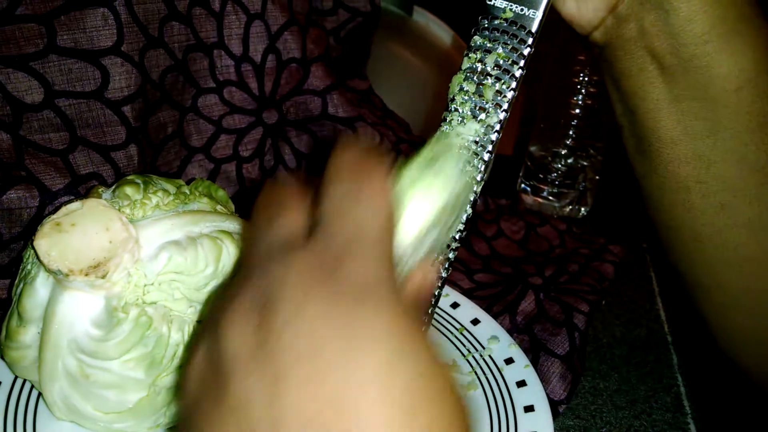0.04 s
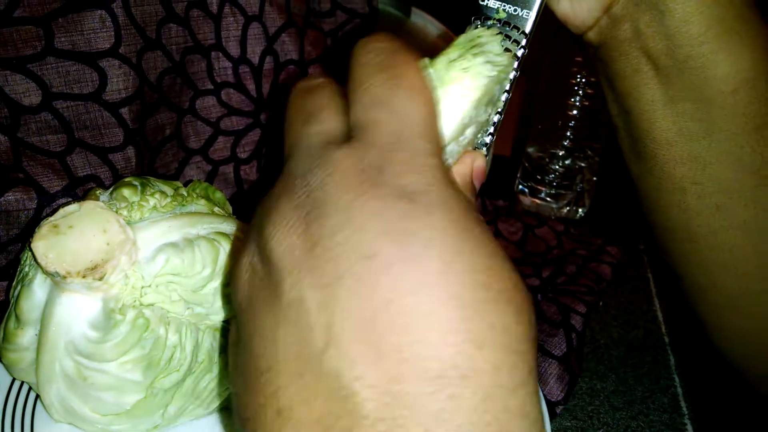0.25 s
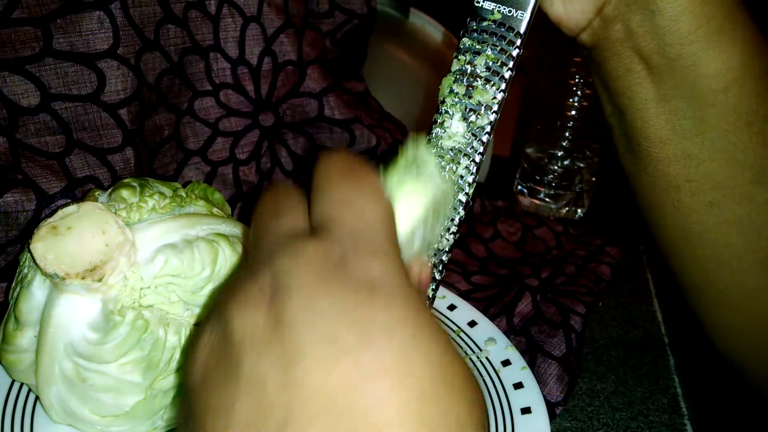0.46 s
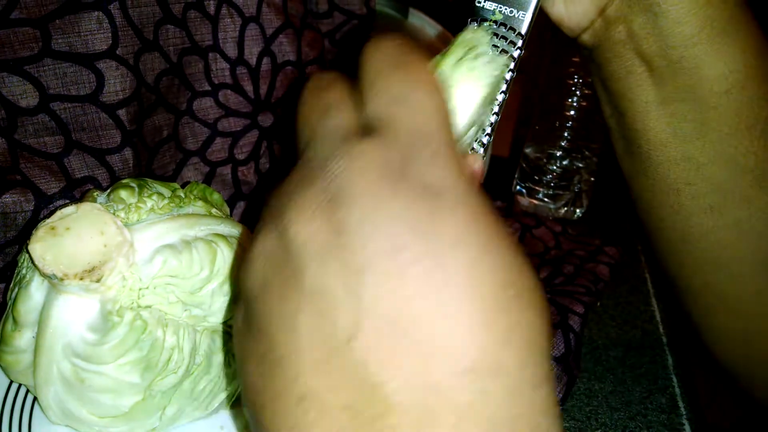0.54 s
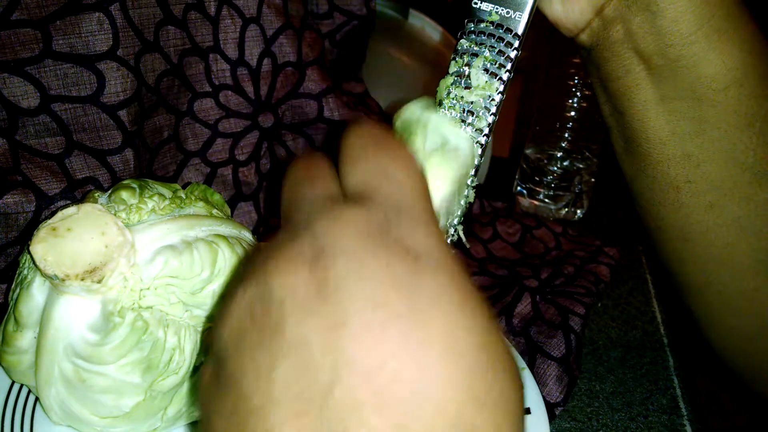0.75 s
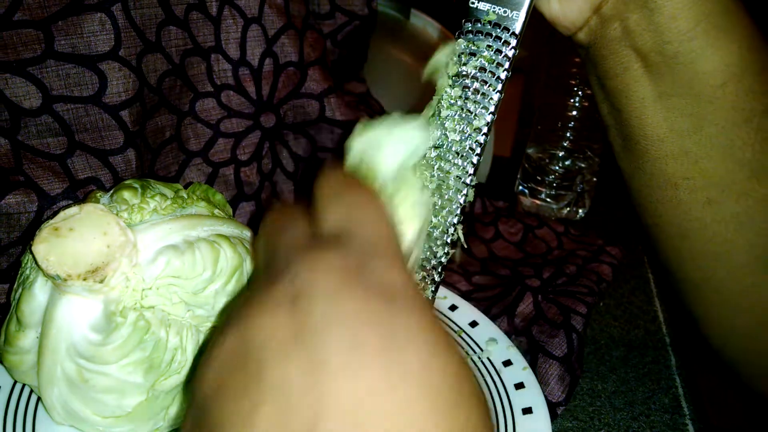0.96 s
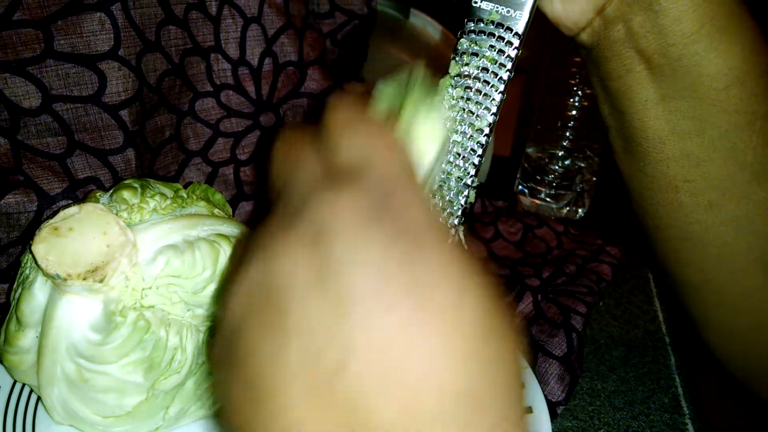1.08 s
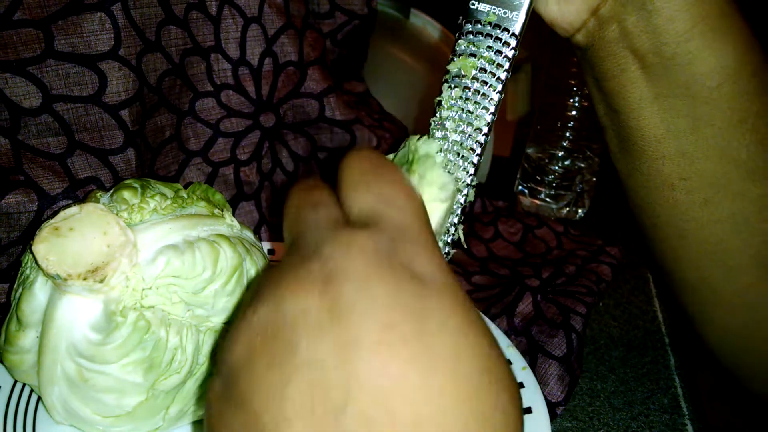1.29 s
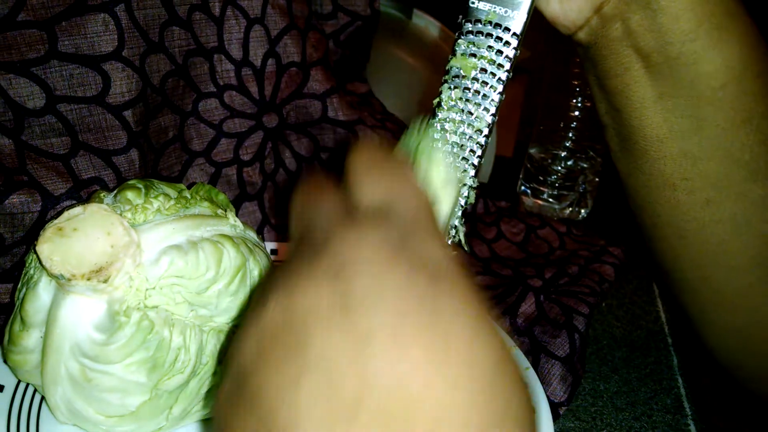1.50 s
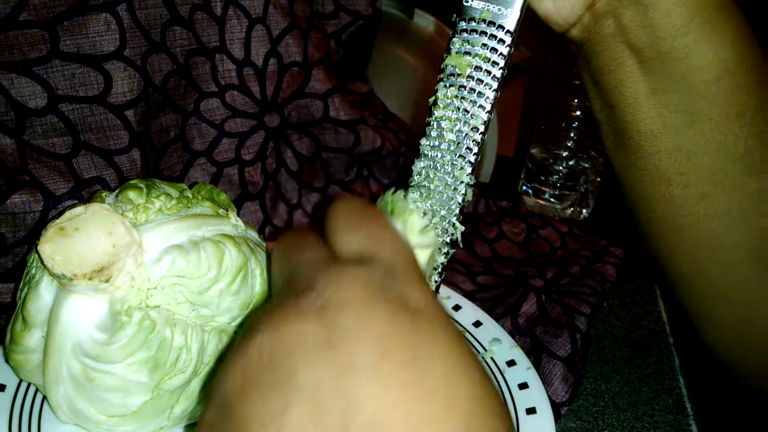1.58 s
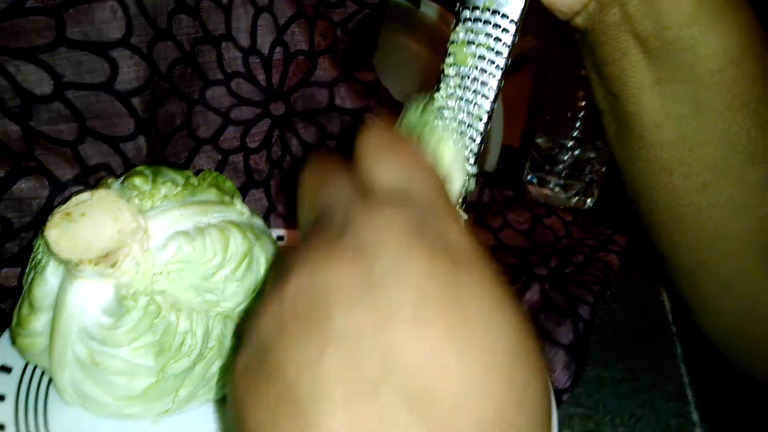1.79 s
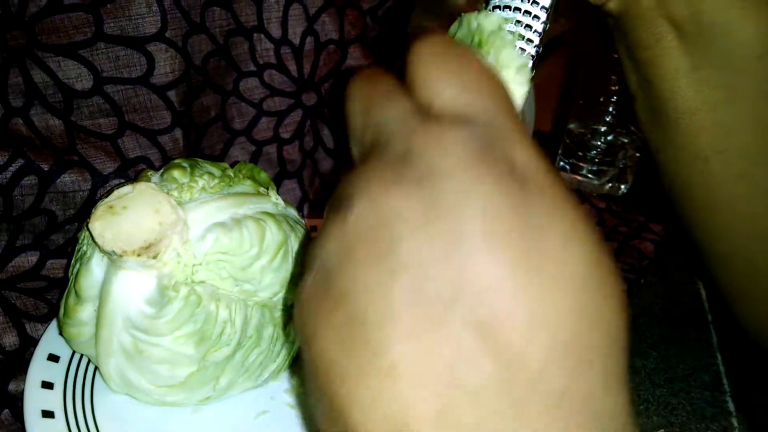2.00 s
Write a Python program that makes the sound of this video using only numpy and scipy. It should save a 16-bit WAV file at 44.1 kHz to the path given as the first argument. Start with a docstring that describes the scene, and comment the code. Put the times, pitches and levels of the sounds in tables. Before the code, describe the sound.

Close, dry rasping of cabbage on metal teeth, three to four cycles per second; strong crunchy downstrokes, lighter return scrapes, tiny snaps and dull table thumps, faint hush and short indoor reverberation behind.

```python
"""A soft upward slide, then a dense downward crackle: cabbage rubbed on a narrow steel grater, 3.5 cycles per s.
Fibres tear as streams of random clicks; rows of teeth jolt modes of plate and table; the blade rings along.
Leaf ribs catch as short gliding squeaks, with dry noise snaps. Faint hush and a short room tail lie behind.
A close phone hears it at two ports: right first, left late and shadowed in the treble."""
import sys
import numpy as np
from scipy import signal
from scipy.fft import rfft, irfft
from scipy.io import wavfile
from scipy.ndimage import uniform_filter1d

SR = 44100
rng = np.random.default_rng(int(sys.argv[2]) if len(sys.argv) > 2 else 0)


def store_pcm(level_fs):
    """Save levels as 16-bit WAV."""
    pcm = np.round(np.clip(level_fs, -1, 1) * 32767).astype(np.int16)
    wavfile.write(sys.argv[1], SR, np.atleast_2d(pcm).T)


N = 90052
T = np.arange(N) / SR
F = np.fft.rfftfreq(N, 1 / SR)


def undb(db):
    """Decibels to amplitude."""
    return 10 ** (np.asarray(db) / 20)


def level(x, db):
    """Scale x to an RMS level."""
    return x * undb(db) / np.sqrt(np.mean(x ** 2))


def over_f(table):
    """Interpolate a table over log frequency at every FFT bin."""
    a = np.array(table, float)
    return np.interp(np.log(F + 1), np.log(a[:, 0] + 1), a[:, 1])


def shape(x, gain):
    """Filter x by a gain per FFT bin."""
    return irfft(rfft(x) * gain, N)


def walk(rate_hz):
    """Random levels, each held 1 / rate_hz and slewed to the next."""
    k = int(SR / rate_hz)
    held = np.repeat(rng.standard_normal(N // k + 1), k)
    return uniform_filter1d(held, k)[:N]


def ring(x, hz, t60_s):
    """One decaying mode: a complex one-pole resonator driven by x."""
    pole = np.exp(2j * np.pi * hz / SR - np.log(1000) / (t60_s * SR))
    return signal.lfilter([1], [1, -pole], x).imag * np.sqrt(1 - abs(pole))


def body(x, modes):
    """Parallel modes driven by x, summed and scaled to unit RMS."""
    return level(sum(undb(db) * ring(x, hz, t60_s) for hz, db, t60_s in modes), 0)


# background noise spectrum: freq_hz, relative_density_db
HUSH_SPECTRUM = [(30, 26.5), (60, 13), (100, -12), (400, -3), (1200, -5.5), (4000, -47), (15000, -44)]
HUSH_DB = -39.5


def hush():
    """Steady shaped noise, independent at each port."""
    gain = undb(over_f(HUSH_SPECTRUM))
    return np.array([level(shape(rng.standard_normal(N), gain), HUSH_DB) for _ in range(2)])


ROOM_DB, ROOM_T60_S = -15, .25


def room(right):
    """Right-port sound convolved with two decaying noise tails, treble damped."""
    u = T[:SR // 2]
    tail = rng.standard_normal((2, len(u))) * undb(-60 * u / ROOM_T60_S)
    tail /= np.sqrt(np.sum(tail[0] ** 2))
    wet = signal.fftconvolve(right[None], tail, axes=1)[:, :N]
    return undb(ROOM_DB) * np.array([shape(w, 1 / (1 + F / 4000)) for w in wet])


# left-port phase lead: freq_hz, lead_rad
PORT_PHASE = [(0, 0), (1640, -.2), (2430, -2.7), (2570, -3.1), (2800, -3.2), (2960, -3.8), (3450, -6.1),
              (4130, -6.6), (6460, -12.8), (15300, -31.6)]
# left level against right: freq_hz, left_minus_right_db
SHADOW = [(50, 3), (110, 0.5), (200, -1), (700, -4.5), (1290, -0.5), (2650, -0.5), (4400, -1), (5400, -4.5),
          (8120, -6), (11000, -10), (15000, -13.5)]
# amplitude share common to both ports: freq_hz, share_0_1
ALIKE = [(40, 0.099), (100, 0.89), (250, 0.59), (1200, 1), (1900, 0.98), (2350, 0.96), (2600, 1),
         (2950, 0.85), (3250, 0.58), (3900, 1), (4600, 0.63), (8000, 0.5), (15000, 0.39)]
# slow random phase wander between left and right around 2.7 kHz
WANDER_RAD, WANDER_RATE_HZ, WANDER_CENTRE_HZ, WANDER_WIDTH_HZ = .2, 9, 2700, 500


def ports(common, own):
    """Left gets the common sound late plus its own part, treble shadowed; right gets the common sound."""
    alike = np.clip(over_f(ALIKE), 0, 1)
    freq_hz, lead_rad = np.array(PORT_PHASE).T
    lead = np.exp(1j * np.interp(F, freq_hz, lead_rad))
    # small-angle phase turn: a quadrature copy of a narrow band
    quadrature = 1j * np.exp(-((F - WANDER_CENTRE_HZ) / WANDER_WIDTH_HZ) ** 2)
    wander = WANDER_RAD * walk(WANDER_RATE_HZ) * shape(common, lead * quadrature)
    left = wander + shape(common, lead * alike) + shape(own, np.sqrt(1 - alike ** 2))
    return np.array([shape(left, undb(over_f(SHADOW))), common])


# rasp spectrum at the right port, main range and top: freq_hz, relative_density_db
RASP_SPECTRUM = [(150, -19), (400, -17), (800, -2.5), (1300, -9), (1750, -5.5), (2250, -4), (3000, -4),
                 (3600, -0.5), (4200, 1), (5100, -0.5), (5600, -1), (6400, -0.5), (7000, 0), (8200, -5)]
RASP_TOP = [(11000, -6.5), (14000, -7), (15400, -5)]


def rasp_colour(x):
    """Filter x to the rasp spectrum."""
    return shape(x, undb(over_f(RASP_SPECTRUM + RASP_TOP)))


# steel blade modes: freq_hz, relative_db, t60_s
BLADE_MODES = [(1665, -7, .04), (3500, -5, .03), (3680, -4, .03), (3830, -5, .03), (4100, -3, .03),
               (4400, -5, .025), (5170, -5, .02), (6600, -4, .02)]


def blade(x, t60_scale=1):
    """Blade modes driven by x, at unit RMS."""
    return body(x, [(hz, db, t60_s * t60_scale) for hz, db, t60_s in BLADE_MODES])


# dry snaps: start_s, relative_level_db
SNAPS = [(.0159, -18), (.1311, -7), (.162, -7), (.2409, -13), (.258, -16), (.3795, -15), (.4243, -7),
         (.4365, -4), (.5282, -9), (.548, -17), (.6818, -16), (.7462, -3), (.8215, -18), (.8525, -18),
         (.9043, -15), (.9727, -16), (.9981, -12), (1.0505, -7), (1.1265, -17), (1.1352, -10),
         (1.2405, -10), (1.281, -9), (1.3105, -7), (1.3315, -7), (1.4262, -10), (1.660, -6), (1.7005, -16),
         (1.72, -10), (1.728, -9), (1.8487, -10), (1.9684, -12), (1.9954, -20)]
SNAP_DECAY_S = .0005  # to 1/e


def snaps():
    """Sharp noise bursts with exponential decay, rasp coloured."""
    out = np.zeros(N)
    u = T[:SR // 200]
    for start_s, level_db in SNAPS:
        burst = np.exp(-u / SNAP_DECAY_S) * rng.standard_normal(len(u)) / 2
        out[int(start_s * SR):][:len(u)] += undb(level_db) * burst
    return rasp_colour(out)


# leaf ribs catching on a tooth:
# middle_s, level_db, pitch_hz, half_length_s, glide_per_s, roughness_0_1, relative_blade_db
SQUEAKS = [(1.1465, -24, 920, .0035, 12, .15, -24), (1.2415, -31, 1380, .003, 10, .7, -25),
           (1.665, -26, 680, .007, -8, .2, -32), (1.275, -33, 1420, .004, 0, .9, -34),
           (1.281, -40, 1350, .003, 0, .9, -25), (1.167, -40, 1100, .003, 0, .9, -28)]
SQUEAK_ROUGH_RATE_HZ = 900


def squeaks():
    """Gliding rough tones under a bell; one slip per cycle rings the blade."""
    out, slips = np.zeros(N), np.zeros(N)
    for middle_s, level_db, pitch_hz, half_s, glide, rough, blade_db in SQUEAKS:
        u = T - middle_s
        bell = np.exp(-(u / half_s) ** 2 / 2)
        phase_rad = 2 * np.pi * pitch_hz * u * (1 + glide * u / 2)
        phase_rad += rough * walk(SQUEAK_ROUGH_RATE_HZ)
        tone = np.sin(phase_rad)
        out += undb(level_db) * bell * (1 + rough * walk(SQUEAK_ROUGH_RATE_HZ)) * tone
        slips += undb(blade_db) * bell * np.diff(np.sign(tone), prepend=0).clip(0, 1)
    rung = blade(slips, t60_scale=.5)
    # peak is set by the strongest blade_db
    rung *= undb(max(row[-1] for row in SQUEAKS)) * 2 / np.abs(rung).max()
    return out + rung


# rows of teeth passing under the wedge: time_s, jolts_per_s
ROWS = [(0.0, 121), (0.14, 112), (0.44, 106), (0.48, 96.5), (0.57, 87), (0.77, 111), (1.0, 119),
        (1.05, 107.6), (1.4, 109.7), (1.46, 95.7), (1.54, 92), (1.62, 119), (1.87, 99), (2.04, 117)]
ROW_JITTER_ROWS, ROW_SPREAD_DB, ROW_NOISE_DB = .09, 3, -1


def jolts():
    """One uneven impulse per row of teeth, over tearing noise."""
    spread, noise = rng.standard_normal((2, N))
    time_s, jolts_per_s = np.array(ROWS).T
    rows = np.cumsum(np.interp(T, time_s, jolts_per_s)) / SR + ROW_JITTER_ROWS * walk(100)
    hits = np.diff(np.floor(np.maximum.accumulate(rows)), prepend=0)
    return level(hits * undb(ROW_SPREAD_DB * spread), 0) + undb(ROW_NOISE_DB) * noise


# plate and table modes: freq_hz, relative_db, t60_s
TABLE_MODES = [(82, -3, .06), (109, 1.5, .07), (181, -3.5, .12), (215, -11, .07), (298, -3, .1),
               (330, -8, .08), (361, -5, .11), (400, -4, .1), (445, -10, .07), (513, -12, .2),
               (662, -15, .07)]
# drive by the hand: time_s, lowest_modes_db, upper_modes_db
SHAKING = [(0.0, -53, -41), (0.03, -41, -41), (0.07, -48, -37), (0.1, -39, -45.5), (0.16, -44, -30.5),
           (0.19, -30, -33), (0.23, -41, -51), (0.25, -55, -42), (0.32, -59, -43.5), (0.38, -44, -45),
           (0.42, -30.5, -31), (0.46, -29.5, -32), (0.52, -48, -45), (0.68, -51, -40), (0.71, -29, -35.5),
           (0.76, -36, -29), (0.83, -52, -47.5), (0.87, -40, -42), (0.94, -55, -43), (0.96, -43, -45),
           (0.99, -45, -36), (1.02, -39, -44), (1.04, -33.5, -31), (1.11, -37, -38.5), (1.16, -54, -45.5),
           (1.21, -68, -41.5), (1.31, -27, -33), (1.33, -36, -31.5), (1.43, -54, -49), (1.46, -55, -46.5),
           (1.56, -43, -42), (1.58, -30, -40.5), (1.62, -40, -31.5), (1.69, -41, -42), (1.8, -68, -43),
           (1.82, -40, -46), (1.89, -36, -31.5), (1.94, -31, -35.5), (1.98, -58, -48), (2.04, -43, -39.5)]
LOW_MODES, LOW_DB, UPPER_DB = 2, -1.5, 1.5
LEAD_S = 0.0046  # the push comes before the ring


def table_and_plate():
    """Jolts, scaled by the shaking curves, ring the lowest and the upper modes."""
    rows = jolts()
    time_s, low_db, upper_db = np.array(SHAKING).T
    low = rows * undb(np.interp(T + LEAD_S, time_s, low_db))
    upper = rows * undb(np.interp(T + LEAD_S, time_s, upper_db))
    low_ring = undb(LOW_DB) * body(low, TABLE_MODES[:LOW_MODES]) * np.std(low)
    upper_ring = undb(UPPER_DB) * body(upper, TABLE_MODES[LOW_MODES:]) * np.std(upper)
    return low_ring + upper_ring


# cutting and return strokes, one curve each: time_s, rasp_level_db
DOWN = [
    [(0.1, -50), (0.118, -29), (0.134, -21), (0.188, -21.5), (0.214, -31.5), (0.222, -42), (0.23, -45)],
    [(0.37, -45), (0.384, -31), (0.434, -18.5), (0.482, -23), (0.51, -49.5)],
    [(0.67, -47), (0.676, -45), (0.682, -31.5), (0.702, -23), (0.742, -18), (0.792, -30), (0.81, -44)],
    [(0.96, -46.5), (0.99, -26), (1.05, -21), (1.088, -24.5), (1.098, -37), (1.104, -35), (1.11, -31)],
    [(1.26, -41.5), (1.272, -31.5), (1.28, -23.5), (1.33, -18.5), (1.374, -28.5), (1.39, -36)],
    [(1.54, -44), (1.552, -31.5), (1.568, -25), (1.612, -20), (1.662, -21), (1.672, -29), (1.68, -37)],
    [(1.82, -36), (1.832, -40.5), (1.85, -27.5), (1.91, -19.5), (1.952, -29), (1.962, -42), (1.97, -32)],
]
UP = [
    [(0.0, -33), (0.01, -33.5), (0.022, -29.5), (0.042, -37.5), (0.068, -36.5), (0.1, -43)],
    [(0.23, -48), (0.258, -32), (0.312, -36.5), (0.326, -36.5), (0.37, -52)],
    [(0.51, -35), (0.532, -49), (0.536, -37.5), (0.566, -29), (0.628, -32.5), (0.67, -45)],
    [(0.81, -46), (0.822, -34), (0.844, -40), (0.854, -32), (0.91, -30.5), (0.96, -42)],
    [(1.11, -51), (1.12, -39.5), (1.14, -25.5), (1.208, -34), (1.242, -30), (1.26, -42)],
    [(1.39, -51), (1.41, -39.5), (1.426, -31), (1.508, -35.5), (1.512, -37), (1.54, -36)],
    [(1.68, -38.5), (1.726, -24), (1.78, -36), (1.79, -30.5), (1.814, -41), (1.82, -42)],
    [(1.97, -32), (1.98, -43), (1.99, -35), (1.996, -36), (2.026, -31), (2.04, -38)],
]
# per stroke, relative to the rasp: treble_db, low_middle_db
DOWN_COLOUR = [(1, 3), (1, 2), (1, 2), (1, -0.5), (1, -1.5), (1, 2), (1, 0.5)]
UP_COLOUR = [(0, 1.), (0.999, 1.), (1, 0.65), (1, 0.14), (0, -0.82), (0.999, 0.), (1, 0.37), (1, -0.84)]
# scuffs as the wedge bites or lets go: start_s, level_db, t60_s
SCUFFS = [(0.2408, -26.5, 0.015), (0.382, -35, 0.043), (0.528, -25.5, 0.031), (0.68, -25, 0.034),
          (1.1266, -36, 0.026), (1.135, -28, 0.015), (1.139, -26, .03), (1.276, -35, .04),
          (1.424, -26, 0.058), (1.968, -27, 0.039)]


def strokes():
    """Rasp level with decaying scuffs (dB), colour offsets (dB) and place along the stroke (0-1)."""
    rows = sorted(zip(DOWN + UP, DOWN_COLOUR + UP_COLOUR), key=lambda r: r[0][0][0])
    points = np.array(sorted(p for curve, _ in rows for p in curve))
    starts_s = np.array([curve[0][0] for curve, _ in rows])
    k = np.clip(np.searchsorted(starts_s, T) - 1, 0, None)
    colour_db = np.array([c for _, c in rows], float)[k].T
    along = (T - starts_s[k]) / np.diff(np.append(starts_s, N / SR))[k]
    power = undb(2 * np.interp(T, points[:, 0], points[:, 1]))
    for start_s, level_db, t60_s in SCUFFS:
        age_s = np.clip(T - start_s, 0, None)
        power += (T >= start_s) * undb(2 * level_db - 120 * age_s / t60_s)
    # 10 ms smoothing at the turns
    return 10 * np.log10(power), uniform_filter1d(colour_db, size=441), uniform_filter1d(along, size=441)


TEARS_PER_S, TEAR_SPREAD_DB, TEAR_MOST = 22000, 1, 2.6  # largest size, in spreads
ROUGH_DB = 2.0


def tears(rough):
    """Fibres tearing: dense random clicks of uneven size, stream level wandering."""
    hit = rng.random(N) < TEARS_PER_S / SR
    push = rng.standard_normal(N)
    size = np.minimum(rng.exponential(size=N), TEAR_MOST)
    return level(hit * push * undb(TEAR_SPREAD_DB * size + ROUGH_DB * rough), 0)


# crossovers of the four rasp bands: edge_hz
BAND_EDGES_HZ = 2420, 3230, 8400
# fall of each band along a stroke, negative rises: fade_db
BAND_FADE_DB = 0.5, -6, -3.5, -1
RASP_DB, BLADE_DB, PATCHY_DB = 2.5, -19, 1.5  # blade relative to the unit rasp
MIDDLE_FOLLOWS, MIDDLE_PIVOT_DB = 0.45, -27  # low middle swings less than the rasp


def grating(rough, patchy):
    """Tears heard directly and through the blade, stroke-shaped in four bands, plus table and plate."""
    stroke_db, (treble_db, middle_db), along = strokes()
    x = tears(rough)
    rasp = level(level(rasp_colour(x), 0) + undb(BLADE_DB) * blade(x), RASP_DB)
    lowpasses = [1 / (1 + (F / hz) ** 6) for hz in BAND_EDGES_HZ]
    bands = np.diff([0 * F] + lowpasses + [1 + 0 * F], axis=0)
    middle_db = middle_db + (MIDDLE_FOLLOWS - 1) * (stroke_db - MIDDLE_PIVOT_DB)
    out = table_and_plate()
    for offset_db, fade_db, patch, band in zip((middle_db, 0, 0, treble_db), BAND_FADE_DB, patchy, bands):
        gain_db = stroke_db + offset_db + fade_db * (.5 - along) + PATCHY_DB * patch
        out += undb(gain_db) * shape(rasp, band)
    return out


ROUGH_RATE_HZ, PATCHY_RATE_HZ = 210, 34


def scene():
    """Grating and catches at two ports, with room and hush."""
    catches = squeaks() + snaps()
    rough = walk(ROUGH_RATE_HZ)
    patchy = [walk(PATCHY_RATE_HZ) for _ in BAND_FADE_DB]
    # separate grains for the left port's own part, same strokes
    common = grating(rough, patchy) + catches
    own = grating(rough, patchy) + catches
    near = ports(common, own)
    return near + room(near[1]) + hush()


BASS_CUT_HZ, TOP_HZ = 73, 15450


def record(dry):
    """The phone drops the deep bass and cuts the top steeply."""
    bass_cut = signal.butter(3, BASS_CUT_HZ, "high", fs=SR, output="sos")
    top_cut = signal.ellip(14, .2, 95, TOP_HZ, fs=SR, output="sos")
    return signal.sosfilt(top_cut, signal.sosfilt(bass_cut, dry))


dry = scene()
out = record(dry)
store_pcm(out)
```